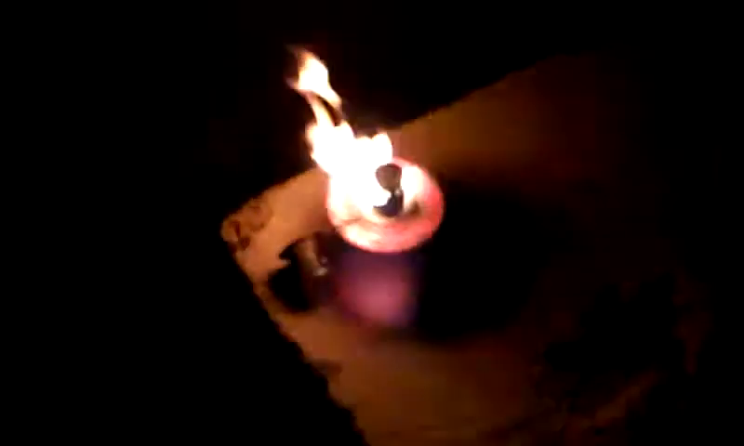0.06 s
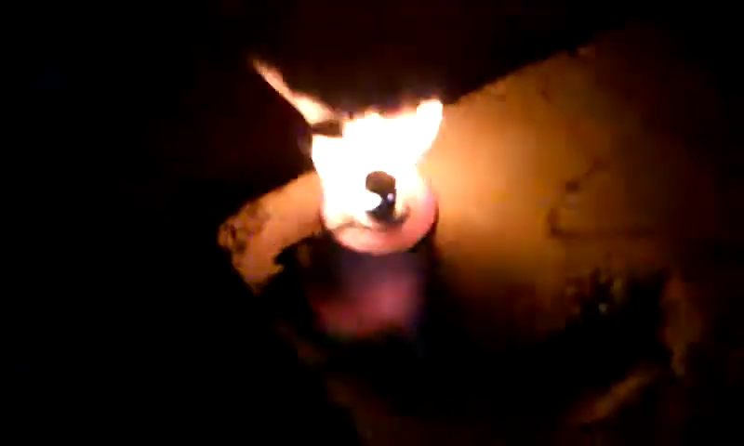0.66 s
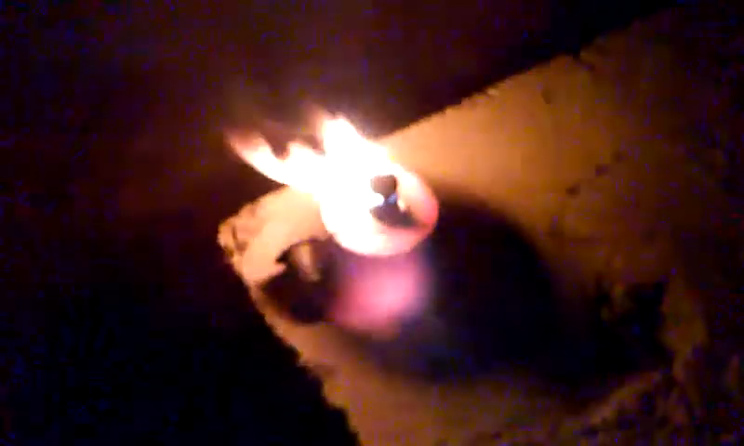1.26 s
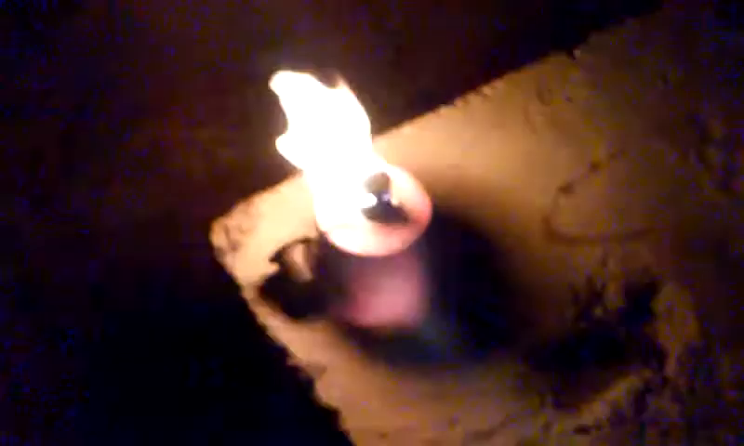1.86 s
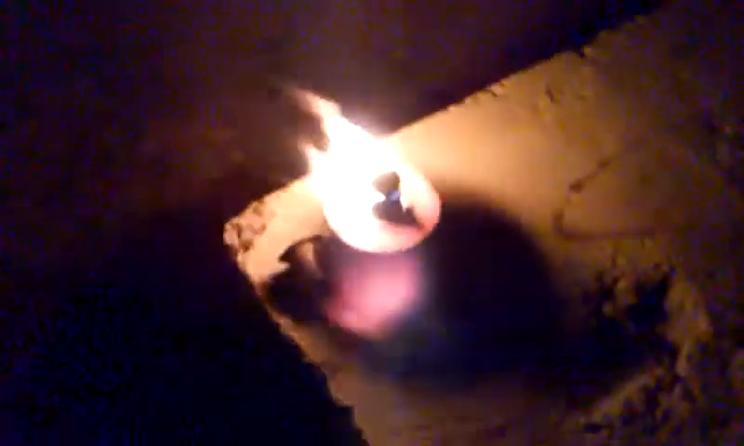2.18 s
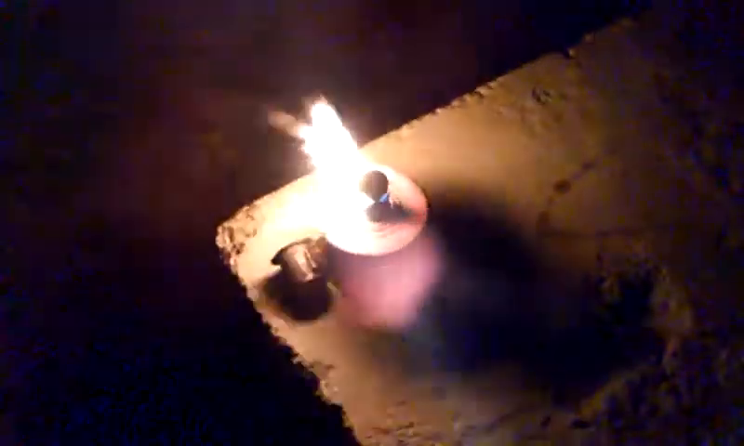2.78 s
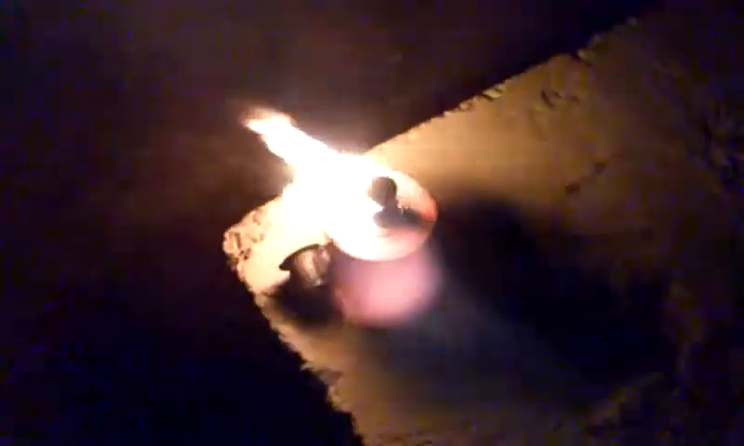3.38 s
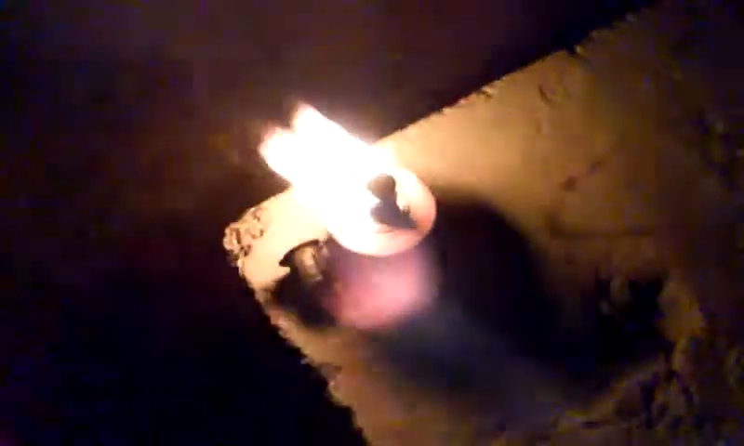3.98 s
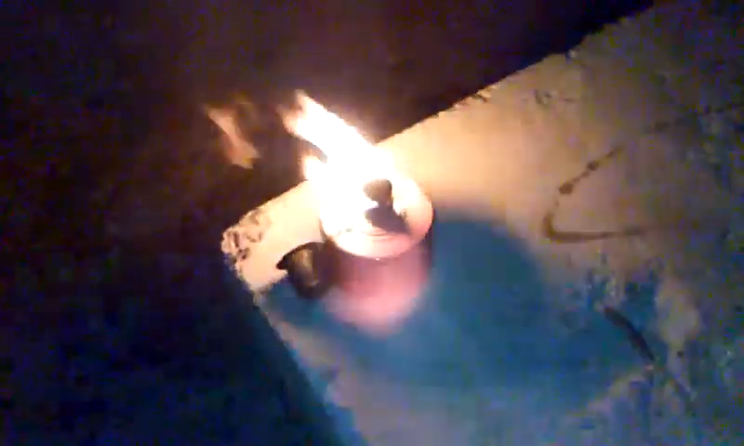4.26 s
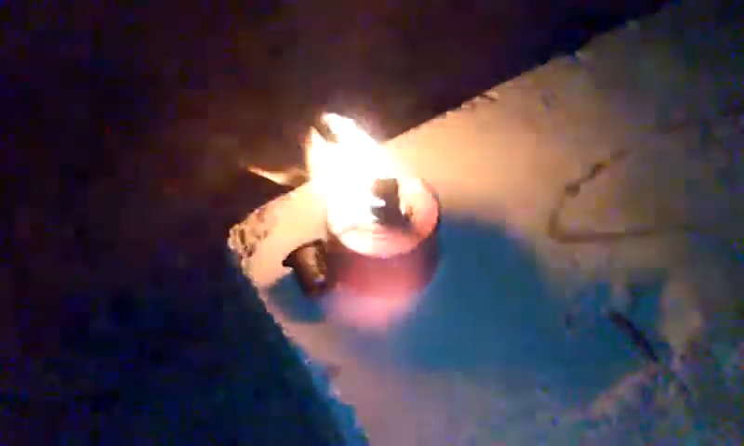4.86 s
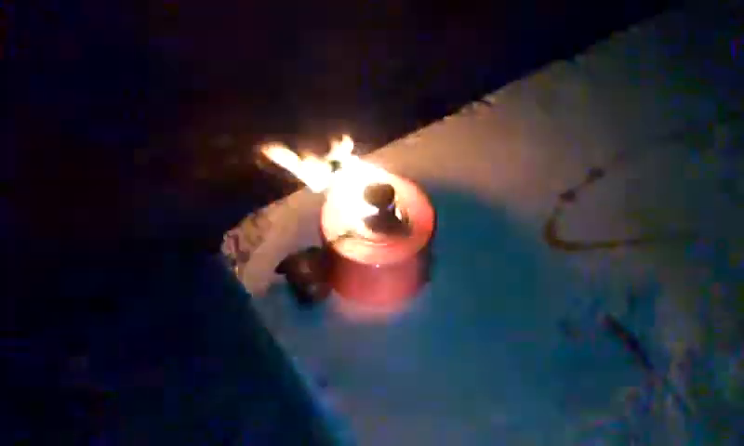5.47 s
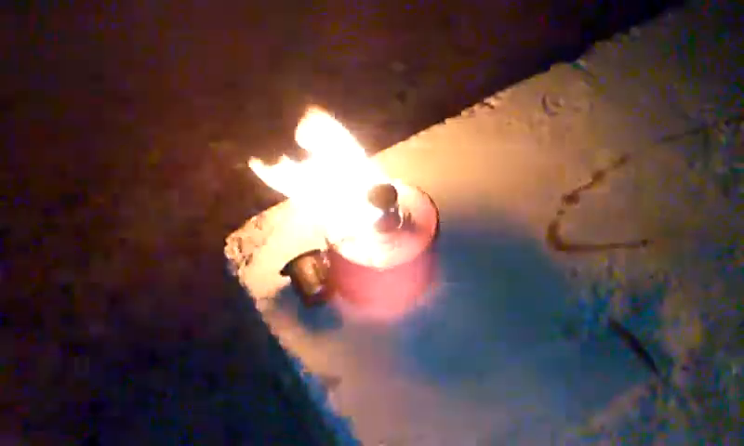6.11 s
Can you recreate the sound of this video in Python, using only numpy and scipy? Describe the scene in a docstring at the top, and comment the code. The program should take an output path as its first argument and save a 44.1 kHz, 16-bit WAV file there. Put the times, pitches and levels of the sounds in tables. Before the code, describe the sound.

Low, puffing flutter of a small burner flame in the wind, with light ticks and spits of boiling fuel.

```python
"""A tin-can burner in the night wind

A small burner flares on a concrete slab, close to the microphone. Its wind-torn flame flutters in
low puffs and now and then flaps hard. Fuel vapour hisses in spurts, and the boiling fuel sputters
and ticks. Wind rumbles underneath, and a soft rush of air dies away after the first second."""
import sys
import numpy as np
from scipy import signal
from scipy.fft import rfft, irfft
from scipy.io import wavfile
from scipy.ndimage import uniform_filter1d

SR = 44100
rng = np.random.default_rng(int(sys.argv[2]) if len(sys.argv) > 2 else 0)


def to_wav(s):
    """Save 16-bit WAV."""
    ch = np.atleast_2d(s).T  # columns
    pcm = np.round(np.clip(ch, -1, 1) * 32767)  # PCM
    wavfile.write(sys.argv[1], SR, pcm.astype(np.int16))


N = 275184
TIME = np.arange(N) / SR

# Wind on the microphone. Each row: time in seconds, level in dB.
WIND_LEVELS = [(0.0, -37), (0.33, -33), (0.52, -46), (1.0, -30.5), (1.3, -33.5), (2.25, -32), (2.45, -41),
               (2.6, -41), (3.4, -35.5), (3.7, -44), (4.0, -41), (4.4, -43), (4.8, -35), (5.35, -41),
               (5.6, -36.5), (5.85, -34.5), (6.05, -39.5), (6.24, -45)]
# The soft rush of the breeze. Each row: time in seconds, level in dB.
BREEZE_LEVELS = [(0, -56.5), (.25, -55.5), (.6, -55), (1.08, -59.5), (1.3, -73.5), (2.1, -72), (2.35, -60),
                 (2.6, -73), (6.24, -69)]
# Vapour and boiling fuel. Each row: time in seconds, relative levels of hiss and of fizz in dB.
VAPOUR_LEVELS = [(0, -60, -60), (.42, -64.5, -65.5), (.6, -65.5, -66), (.8, -62.5, -62.5),
                 (1.15, -63, -68.5), (1.35, -64, -65.5), (1.95, -63.5, -66), (2.42, -64.5, -63),
                 (2.62, -66.5, -65), (2.87, -68.5, -67), (3.22, -68, -72.5), (3.33, -70, -68.5),
                 (3.62, -73, -65), (3.93, -70, -69.5), (4.38, -68, -68), (4.47, -74, -72.5),
                 (4.6, -67, -64.5), (4.95, -67.5, -70.5), (5.17, -66.5, -68.5), (5.3, -68.5, -73),
                 (5.38, -65.5, -70), (5.6, -66.5, -73), (5.7, -69.5, -67.5), (5.92, -66.5, -75),
                 (6.24, -63, -66)]
# The flame's soft roar. Each row: time in seconds, relative level in dB.
ROAR_LEVELS = [(1.0, -68), (1.42, -61), (1.7, -62.5), (2.0, -72), (2.6, -63), (3.0, -65.5), (3.27, -57.5),
               (3.4, -56.5), (3.47, -57), (3.58, -53), (3.72, -64), (4.15, -60.5), (4.38, -63.5),
               (4.47, -64.5), (4.7, -57.5), (4.88, -63.5), (5.17, -53.5), (5.33, -60.5), (5.59, -53),
               (5.69, -62), (6.1, -56.5), (6.24, -64)]
# The flame flares and sinks. Each row: time in seconds, relative levels of puffs and of swirls in dB.
FLAME_LEVELS = [(0.0, -11, -35), (0.08, -30, -43), (0.19, -25.5, -39), (0.38, -28.5, -42), (0.7, -29, -43),
                (0.77, -30, -43.5), (1.1, -30, -40), (1.25, -31, -42.5), (1.42, -33.5, -55),
                (1.58, -34.5, -50.5), (1.78, -34.5, -45.5), (2.08, -26, -38.5), (2.3, -30.5, -41.5),
                (2.53, -30.5, -39.5), (2.66, -30.5, -45.5), (2.82, -32, -54), (3.0, -29, -44.5),
                (3.18, -28, -45), (3.4, -39, -45.5), (3.52, -33, -47.5), (3.62, -45, -55), (3.86, -40, -64),
                (3.98, -29.5, -43), (4.07, -27.5, -50), (4.2, -35.5, -48), (4.42, -48, -52.5),
                (4.52, -44, -57), (4.62, -42.5, -71), (4.82, -32.5, -46), (5.4, -34.5, -47.5),
                (5.66, -35.5, -55.5), (5.82, -27.5, -39), (5.93, -31, -37.5), (6.02, -37, -45),
                (6.14, -23.5, -40.5), (6.24, -38.5, -40.5)]

# The tone of each noise, from low to high. Each row: frequency in Hz, relative strength in dB.
WIND_TONE = [(14, -13), (25, -10), (45, -8.5), (65, -4), (100, -16), (200, -36.5)]  # deep rumble
BREEZE_TONE = [(500, -4.5), (730, -6.5), (870, 4.5), (1080, 1), (1280, -9.5), (1650, -8), (2000, -16),
               (2250, -12.5), (2500, -28), (2850, -9.5), (3300, -60), (4500, -55)]  # hollow rush
SPURT_TONE = [(3800, -7), (5600, -4), (6300, -4), (7100, 4.5), (9000, 3), (10400, 5), (12000, -1),
              (15500, -3)]  # bright jet
HISS_TONE = [(3000, -49), (5500, -8.5), (7200, 5), (8500, 5), (10300, 4), (12500, 0.5), (15500, -4)]  # thin, high vapour
FIZZ_TONE = [(1500, 8.5), (2200, 3.5), (2600, -3.5), (3150, 1.5), (3700, 0), (4500, 1.5), (5200, -2),
             (6000, 3), (8000, -23)]  # boiling fuel
ROAR_TONE = [(280, 11.5), (420, 5.5), (600, -1), (740, -0.5), (950, -4), (1200, -3.5), (1550, -4.5),
             (1950, -17), (2250, -6), (2700, -10), (4000, -15.5)]  # the flame's edge
SWIRL_TONE = [(110, -52), (185, 3), (235, -1), (300, -8), (400, -19.5), (600, -30.5), (1000, -62),
              (2000, -93)]  # small swirls in the flame
PUFF_TONE = [(20, -56), (35, -17.5), (60, 0.5), (90, 2.5), (120, 0), (155, -5), (200, -14.5), (260, -28),
             (350, -35), (500, -59)]  # low puffs of flame

# The tones the hot tin rings with. Each row: pitch in Hz, level in dB, fade time in seconds.
TIN_TONES = [(8450, -54, .008), (8900, -55, .008), (13900, -53, .004), (14550, -47, .004)]
# Hollow notes. Each row: start in seconds, level in dB, pitch in Hz, fade time in seconds.
HOOTS = [(1.402, -43.5, 602, 0.019), (4.502, -42.5, 315, 0.028)]
# Patches of frying fuel. Each row: middle in seconds, half length in seconds, level in dB.
SIZZLES = [(.65, 0.28, -74), (1.393, 0.18, -73), (1.708, 0.041, -71), (2.03, 0.23, -74),
           (3.484, 0.086, -72.5), (4.68, 0.069, -72)]
# Spurts of vapour. Each row: start in seconds, length in seconds, level in dB, treble tilt in dB/octave.
SPURTS = [(.1, 0.22, -82, 9), (0.237, 0.3, -64.5, 4), (2.702, 0.081, -66, -6), (2.899, 0.068, -65, -4),
          (2.98, 0.064, -68.5, -3), (3.08, .06, -68, -6), (3.145, 0.13, -67, -8), (3.395, 0.13, -68.5, 0),
          (3.541, 0.164, -65.5, -1), (3.73, 0.02, -68, -2), (3.778, 0.087, -66.5, -10),
          (4.083, .075, -67, 9), (4.508, 0.039, -68, -1), (5.055, 0.066, -66.5, -8)]
# Loud bursts of fuel. Each row: time in seconds, relative peak in dB, pitch in Hz, width in octaves.
SPUTTERS = [(0.4421, -43, 915, 0.5), (.532, -42, 770, 1.8), (.729, -41, 426, 1.1), (.797, -43, 484, 0.65),
            (.84, -48, 620, 1.2), (1.236, -38, 354, 0.54), (1.3, -47, 460, 0.49), (1.362, -47, 476, 0.51),
            (1.57, -53, 1520, 0.3), (1.68, -60, 1750, 0.9), (1.8, -53, 1290, 0.54),
            (2.8262, -49, 1860, 0.62), (3.07, -49, 890, 0.69), (3.178, -53, 844, 0.61),
            (3.21, -56, 1810, 0.81), (3.2657, -40, 640, 2.2), (3.295, -46, 620, 2.2),
            (3.3378, -52, 1270, 0.43), (3.353, -52, 1500, 0.28), (3.4417, -38.5, 704, 1.7),
            (3.4669, -42.5, 730, 1.9), (3.484, -41, 750, 2.4), (3.4934, -44, 1080, 0.41),
            (3.526, -51, 950, 0.78), (3.7393, -44.5, 1090, 0.83), (3.7836, -53, 1120, 0.58),
            (3.798, -49, 1080, 0.67), (3.8273, -48, 850, 0.47), (3.865, -48, 1060, 0.57),
            (3.9187, -48, 1360, 0.35), (4.073, -51, 900, 1.2), (4.16, -57, 650, 0.61),
            (4.25, -49.5, 800, 2.8), (4.317, -52, 555, 0.35), (4.3656, -52, 1160, 0.54),
            (4.396, -51, 990, 1.2), (4.569, -51, 640, 0.75), (4.636, -48, 395, 0.89),
            (4.6552, -48.5, 990, 0.35), (4.9788, -45, 1020, 0.18), (5.076, -50, 1100, 0.86),
            (5.091, -45, 1210, 0.6), (5.133, -42.5, 1030, 0.41), (5.143, -47, 1480, 0.35),
            (5.1691, -32.5, 990, 0.69), (5.1844, -38, 790, 1.07), (5.236, -50, 1160, 0.32),
            (5.538, -57, 796, 0.91), (5.58, -42, 850, 0.84), (5.588, -37, 1150, 0.82),
            (5.6122, -45, 760, 1.3), (5.635, -52, 1340, 0.55), (5.7555, -45, 920, 0.45),
            (5.815, -52, 960, 0.32), (5.8531, -45, 740, 1.1), (5.9543, -49.5, 840, 0.52),
            (5.97, -49.5, 1150, 0.42), (6.0211, -49, 1010, 0.56), (6.09, -49.5, 1450, 1.15),
            (6.1027, -47.5, 1350, 0.42)]  # large pockets
SPITS = [(.14, -57, 2230, 0.45), (.3, -54, 2800, 0.76), (.357, -50, 3700, 1.3), (0.5244, -51.5, 4130, 0.23),
         (.732, -56, 3900, 0.51), (1.114, -57.5, 2900, .5), (1.29, -61, 4430, 0.16),
         (1.36, -63, 4700, 0.17), (1.726, -56, 3100, .3), (1.785, -57.5, 3120, 0.3),
         (1.865, -56.5, 3860, 0.36), (1.7434, -50, 3130, 0.28), (1.8903, -53, 4370, 0.29),
         (1.9163, -50.5, 3360, 0.23), (2.0167, -53.5, 4520, 0.18), (2.397, -50, 6760, 0.32),
         (2.4052, -46, 3780, 0.22), (2.5607, -53, 5850, .15), (2.991, -50, 4200, 0.14),
         (3.1492, -50, 5140, 0.51), (3.441, -53.5, 5040, 1.7), (3.634, -52, 3600, 0.69),
         (3.6561, -48.5, 4400, 0.23), (3.6972, -56, 4530, 0.19), (3.8245, -56, 2860, 0.13),
         (4.0965, -43.5, 5400, 0.27), (4.2506, -56.5, 3640, 0.36), (5.0691, -55, 2280, 0.18),
         (5.145, -59, 3200, 0.21), (5.185, -58, 3000, 0.7), (5.5889, -47.5, 3170, 0.17),
         (5.6, -56, 3120, 0.16), (5.617, -60, 3150, 0.16), (5.636, -60, 3280, .25),
         (5.9844, -50, 2600, 0.66), (5.9972, -56, 3240, 0.22), (6.022, -55, 2400, .8),
         (6.085, -57, 2600, 0.93), (6.105, -55, 2930, 1.2), (6.13, -59, 3300, 0.46)]  # smaller pockets
TICKS = [(0.7926, -46.5, 7850, 0.55), (.988, -50, 8300, 0.65), (1.298, -54, 7700, 0.32),
         (1.3213, -48, 7700, 0.52), (1.475, -49.5, 9500, .7), (1.744, -47.5, 7500, .8),
         (2.0523, -50.5, 9000, .5), (2.2388, -45.5, 8600, .55), (2.2558, -50, 8800, 0.49),
         (2.4597, -45.5, 7100, 0.51), (2.7065, -40, 10300, 0.23), (2.7243, -51, 10500, .4),
         (2.9216, -48.5, 8350, 0.82), (3.0132, -48, 7900, .6), (3.0757, -49, 9200, 0.77),
         (3.119, -52, 7800, 0.29), (3.1686, -48.5, 6300, 0.49), (3.1948, -49, 8700, 0.99),
         (3.21, -47, 10000, 1), (3.4894, -48, 5670, .8), (3.5535, -50, 9400, 0.59),
         (3.7816, -49.5, 7200, 0.65), (3.9236, -52, 7500, 1), (4.094, -47, 8500, 0.61),
         (4.5099, -51, 7600, .6), (5.0614, -44, 7460, 0.53)]  # droplets
# Hard flaps of flame. Each row: middle in seconds, relative peak in dB, pitch in Hz, half length in cycles.
FLAPS = [(0.013, -9, 167, 0.78), (0.044, -13, 118, 1.8), (0.138, -26, 92, 1.1), (0.166, -17.5, 181, 1.04),
         (0.184, -16.5, 96, 1.1), (.21, -15, 96, 1), (0.294, -16.5, 77, 0.68), (.355, -23, 153, 1.8),
         (0.403, -20, 87, 1), (.462, -18.5, 105, 0.98), (0.631, -18.5, 100, 3), (.68, -20, 98, 0.74),
         (0.723, -11, 129, 0.69), (0.885, -16, 91, .8), (0.922, -21, 94, 1.06), (.98, -17, 81, 0.56),
         (1.049, -15.5, 108, 0.68), (1.121, -19, 122, .5), (1.138, -19.5, 74, 0.34),
         (1.233, -16.5, 149, 0.77), (1.273, -16.5, 95, 0.64), (1.335, -18.5, 112, 0.82),
         (1.383, -15, 85.5, 0.76), (1.671, -22, 121, 1.25), (1.853, -16.5, 97.5, 0.63),
         (1.926, -23.5, 127, 0.81), (2.014, -15, 125, 0.51), (2.035, -20, 99, 0.6), (2.063, -21, 150, 0.92),
         (2.128, -20, 192, 0.65), (2.186, -18, 109, 0.95), (2.371, -17.5, 90, 2.9),
         (2.502, -14.5, 124, 0.52), (2.559, -12.5, 104.5, 0.93), (2.775, -17, 88, 0.51),
         (2.899, -16, 146, 0.43), (2.924, -22.5, 88, 0.97), (2.974, -14.5, 101, 0.46),
         (3.105, -16.5, 101, 0.6), (3.153, -23.5, 116, 1), (3.2, -18, 103, 0.76), (3.266, -27, 125, .5),
         (3.378, -18.5, 106, 0.52), (3.427, -22.5, 104, .7), (3.468, -24.5, 103, 2),
         (3.505, -21.5, 99, 1.9), (3.955, -24, 75, 1.7), (4.04, -25, 135, 0.66), (4.062, -17, 115, 0.38),
         (4.13, -25.5, 96, 1.3), (4.158, -19.5, 119, 2), (4.225, -17.5, 89.5, 1), (4.314, -23.5, 82, 1.7),
         (4.49, -26.5, 87, 2.3), (4.562, -20.5, 89, 0.71), (4.825, -17.5, 78, 1.25),
         (4.87, -17, 82.4, 1.07), (5.215, -16, 88, 0.88), (5.387, -16.5, 91, 0.43), (5.421, -21, 110, 0.5),
         (5.53, -21, 87, 0.79), (5.563, -18.5, 102, 1.5), (5.684, -21.5, 84, .5), (5.765, -19, 122, 0.38),
         (5.793, -17, 150, .6), (5.872, -17.5, 140, 0.76), (5.942, -17, 122, 1.5), (5.983, -17.5, 97, 1.2),
         (6.123, -11.5, 96.7, 1.5), (6.15, -19.5, 128, 1), (6.176, -10.5, 118, 0.65)]
# The whole sound dips briefly. Each row: middle in seconds, half length in seconds, depth in dB.
DIPS = [(3.719, 0.0049, 14), (3.874, 0.013, 9), (4.428, 0.011, 13)]


def gain(db):
    """Turn decibels into a number to multiply a sound by."""
    return 10 ** (np.asarray(db) / 20)


def normalise(x):
    """Scale a sound so that its average strength (rms) is 1."""
    return x / np.sqrt(np.mean(x ** 2))


def curves(table):
    """Join a table's points with straight lines, giving one curve for each level column."""
    times, *columns = np.transpose(table)
    return [np.interp(TIME, times, column) for column in columns]


def shape(x, tone):
    """Filter a sound to follow a tone table, at strength 1."""
    hz, db = np.transpose(tone)
    freqs = np.maximum(np.arange(N // 2 + 1) * SR / N, 1)
    weights = gain(np.interp(np.log(freqs), np.log(hz), db))
    roll_off = np.minimum(freqs / hz[0], 1) * np.minimum(hz[-1] / freqs, 1)
    return normalise(irfft(rfft(x) * weights * roll_off ** 2, N))


def drift(rate_hz):
    """A smooth random wobble, typically about 1 in size."""
    hold = int(SR / rate_hz)
    steps = rng.standard_normal(N)[np.arange(N) // hold]
    return normalise(uniform_filter1d(steps, hold))


def clicks(per_second, spread_db):
    """Random clicks, mostly small and a few large, at strength 1."""
    present = rng.random(N) < per_second / SR
    size = gain(spread_db * np.minimum(rng.exponential(size=N), 5))
    return normalise(present * size * rng.choice([-1, 1], N))


def even_out(x, span_s):
    """Flatten slow swells, keeping any flutter quicker than the span."""
    span = int(span_s * SR)
    power = uniform_filter1d(uniform_filter1d(x ** 2, span), span)
    return x / np.sqrt(np.abs(power) + 1e-9)


def band(x, hz, octaves):
    """Keep only the frequencies around one pitch."""
    edges = np.minimum(hz * 2. ** (octaves * np.array([-.5, .5])), [SR / 3, SR / 2 - 1000])
    return signal.sosfilt(signal.butter(3, edges, "bandpass", fs=SR, output="sos"), x)


def add(out, start_s, sound):
    """Mix a sound into out at the given time."""
    place = int(start_s * SR) + np.arange(len(sound))
    inside = (place >= 0) & (place < N)
    out[place[inside]] += sound[inside]


def pops(per_second, low_hz, high_hz, cycles, spread_db):
    """A swarm of short pitched pops, each swelling fast and soon dying, at strength 1."""
    out = np.zeros(N)
    draws = rng.random((4000, 4))
    for when, pitch, size, phase in draws[:int(per_second * N / SR)]:
        hz = low_hz * (high_hz / low_hz) ** pitch
        age = np.arange(int(7 * cycles * SR / hz)) * hz / SR / cycles  # the pop is loudest at age 1
        pop = age * np.exp(-age) * np.sin(2 * np.pi * (age * cycles + phase))
        db = spread_db * min(-np.log(1 - size), 4)
        add(out, when * N / SR, gain(db) * pop)
    return normalise(out)


def microphone_hiss(level_db=-78):
    """The microphone adds a faint, steady hiss."""
    return gain(level_db) * rng.standard_normal(N)


def breeze(echo=0.14, delay_s=0.00441, wander=0.074, flicker_db=2):
    """A hollow rush of air mixes with its echo off the ground, whose short delay wanders."""
    level_db, = curves(BREEZE_LEVELS)
    rush = shape(rng.standard_normal(N), BREEZE_TONE)
    bounce = np.interp(TIME - delay_s * (1 + wander * drift(4)), TIME, rush)
    return gain(level_db + flicker_db * drift(40)) * normalise(rush + echo * bounce)


def wind():
    """Slow swirls of wind press on the microphone and make it rumble."""
    level_db, = curves(WIND_LEVELS)
    rumble = shape(rng.standard_normal(N), WIND_TONE)
    return gain(level_db) * even_out(rumble, span_s=0.088)


def tink(start_s=.454, rise_s=.001):
    """The hot tin expands and rings once, very briefly."""
    age = np.maximum(TIME - start_s, 0)
    swell = 1 - np.exp(-age / rise_s)
    return swell * sum(gain(db) * np.exp(-age / fade_s) * np.sin(2 * np.pi * hz * age)
                       for hz, db, fade_s in TIN_TONES)


def hoots(rise_s=0.0044, waver=0.028):
    """Short, wavering hollow notes, like air blowing across the can's opening."""
    out = np.zeros(N)
    for start_s, db, hz, fade_s in HOOTS:
        age = np.maximum(TIME - start_s, 0)
        swell = (1 - np.exp(-(age / rise_s) ** 2)) * np.exp(-age / fade_s)
        pitch_hz = hz * (1 + waver * drift(100))
        out += gain(db) * swell * np.sin(2 * np.pi * np.cumsum(pitch_hz) / SR)
    return out


def sizzle(hz=4450, spread=1.06):
    """Patches of fuel fry on the hot lid in tiny pops, all near one pitch."""
    patches = sum(gain(db) * np.exp(-((TIME - middle_s) / half_s) ** 4)
                  for middle_s, half_s, db in SIZZLES)
    return patches * pops(90, low_hz=hz / spread, high_hz=hz * spread, cycles=5, spread_db=2.5)


def spurts(rise_s=0.0023, fade_s=.018, spray_db=-4):
    """Vapour breaks out, blows for a moment with a fine spray of droplets, and chokes off."""
    out = np.zeros(N)
    t = np.arange(SR // 2) / SR
    jet = shape(rng.standard_normal(N) + gain(spray_db) * clicks(830, spread_db=6), SPURT_TONE)
    octave = np.log2(np.maximum(np.fft.rfftfreq(len(t), 1 / SR), SPURT_TONE[0][0]))
    for start_s, length_s, db, tilt in SPURTS:
        piece = np.roll(jet, -int(start_s * SR))[:len(t)]
        gas = normalise(irfft(rfft(piece) * gain(tilt * octave), len(t)))  # brighter or duller
        opening = 1 - np.exp(-t / rise_s)
        closing = np.exp(-np.maximum(t - length_s, 0) / fade_s)
        add(out, start_s, gain(db) * opening * closing * gas)
    return out


def vapour(hiss_db=-0.3, fizz_db=-2, droplet_db=-11, simmer_db=-9.5, surge_hz=16, surge_db=.5):
    """Vapour hisses out of the can in small, uneven surges, dotted with tiny bubbles of boiling fuel."""
    jet_db, boil_db = curves(VAPOUR_LEVELS)
    hiss = shape(rng.standard_normal(N), HISS_TONE) * gain(.5 * drift(40))
    droplets = pops(140, low_hz=6500, high_hz=11000, cycles=3, spread_db=3.5)
    fizz = shape(rng.standard_normal(N), FIZZ_TONE) * gain(0.57 * drift(50))
    simmer = pops(220, low_hz=2900, high_hz=5600, cycles=4.5, spread_db=2.8)
    jet = gain(hiss_db) * hiss + gain(droplet_db) * droplets
    boil = gain(fizz_db) * fizz + gain(simmer_db) * shape(simmer, FIZZ_TONE)
    return gain(surge_db * drift(surge_hz)) * (gain(jet_db) * jet + gain(boil_db) * boil)


def weak_rows(level_db, above_db, low_hz, high_hz, octaves, count=20, spread_db=5):
    """Rows like those of SPUTTERS for weak bursts at random times, a little above a level curve."""
    when, size, pitch = rng.random((count, 3)).T
    db = level_db[(when * N).astype(int)] + above_db + spread_db * (size - .5)
    hz = low_hz * (high_hz / low_hz) ** pitch
    return list(zip(when * N / SR, db, hz, np.full(count, octaves)))


def bursts(rows, rise_s, fade_s, tail_db, tail_s):
    """Each pocket of fuel bursts with a short pop of noise and leaves a weak, wider hiss behind."""
    out = np.zeros(N)
    t = np.arange(-SR // 50, SR // 8) / SR
    age = np.maximum(t, 0)
    rise = np.exp(-(np.minimum(t, 0) / rise_s) ** 2)
    for time_s, db, hz, octaves in rows:
        pop_noise, tail_noise = rng.standard_normal((2, len(t)))
        pop = band(pop_noise * rise * np.exp(-age / fade_s), hz, octaves)
        tail = normalise(band(tail_noise, hz, octaves + .5)) * rise * np.exp(-age / tail_s)
        burst = pop / np.abs(pop).max() + gain(tail_db) * tail
        add(out, time_s + t[0] - fade_s / 2, gain(db) * burst)
    return out


def crackle(sputter_db=1, spit_db=2, tick_db=3):
    """Large pockets of boiling fuel sputter, smaller ones spit, and bursting droplets tick."""
    roar_db, = curves(ROAR_LEVELS)
    jet_db, boil_db = curves(VAPOUR_LEVELS)
    weak_sputters = weak_rows(roar_db, above_db=6, low_hz=750, high_hz=1500, octaves=.8)
    weak_spits = weak_rows(boil_db, above_db=6, low_hz=2700, high_hz=5600, octaves=.4)
    weak_ticks = weak_rows(jet_db, above_db=9, low_hz=6800, high_hz=9800, octaves=.8)
    sputters = bursts(SPUTTERS + weak_sputters, rise_s=.0024, fade_s=.00483, tail_db=-33, tail_s=.055)
    spits = bursts(SPITS + weak_spits, rise_s=.0016, fade_s=.003, tail_db=-20.5, tail_s=.055)
    ticks = bursts(TICKS + weak_ticks, rise_s=.0006, fade_s=.0012, tail_db=-28, tail_s=.02)
    return gain(sputter_db) * sputters + gain(spit_db) * spits + gain(tick_db) * ticks


def roar(noise_db=-7, pop_db=-6, rasp_db=-7.5, flicker_db=3):
    """The edge of the flame tears into small pops and a dry rasp over a soft roar."""
    level_db, = curves(ROAR_LEVELS)
    noise = shape(rng.standard_normal(N), ROAR_TONE) * gain(flicker_db * drift(60))
    popping = shape(pops(110, low_hz=520, high_hz=1900, cycles=3, spread_db=3), ROAR_TONE)
    rasp = shape(clicks(350, spread_db=2.5), ROAR_TONE)
    return gain(level_db) * (gain(noise_db) * noise + gain(pop_db) * popping + gain(rasp_db) * rasp)


def flaps(flap_db=-1.27, swirl_db=-34, tear_hz=104):
    """The sheet of flame snaps: a quick suck and push of air that tears off small swirls."""
    snaps, tearing = np.zeros(N), np.zeros(N)
    t = np.arange(-SR // 25, SR // 25) / SR
    for (middle_s, db, hz, cycles), phase in zip(FLAPS, rng.random(len(FLAPS))):
        swell = gain(db) * np.exp(-(t * hz / cycles) ** 2) * np.hanning(len(t))
        add(snaps, middle_s + t[0], swell * np.cos(2 * np.pi * (hz * t + phase)))
        add(tearing, middle_s + t[0], swell * (hz / tear_hz) ** 2)  # quicker flaps tear off more
    swirls = shape(rng.standard_normal(N), SWIRL_TONE)
    return gain(flap_db) * snaps + gain(swirl_db) * tearing * swirls


def puffing(puff_hz=11.8, unevenness=0.2635, puff_db=2, gust_hz=13, gust_db=3.5):
    """A loudness curve: the flame swells and pinches off in a loose rhythm while wind tugs at it."""
    cycles = np.cumsum(puff_hz * np.exp(unevenness * drift(10))) / SR
    gusts = np.minimum(drift(gust_hz), 1)
    return normalise(gain(puff_db * np.cos(2 * np.pi * cycles) + gust_db * gusts))


def flutter(body_db=1, swirl_db=-1.5, flicker_db=4.5):
    """Pockets of vapour burn in quick, low puffs; small swirls ride on the big ones."""
    low_db, fast_db = curves(FLAME_LEVELS)
    body = even_out(shape(clicks(500, spread_db=3), PUFF_TONE), span_s=.05)
    swirls = even_out(shape(clicks(1200, spread_db=2), SWIRL_TONE), span_s=.05)
    swirls = normalise(swirls * gain(flicker_db * np.minimum(drift(45), 1)))
    return puffing() * (gain(low_db + body_db) * body + gain(fast_db + swirl_db) * swirls)


def scene():
    """Mix flame, fuel and wind into one channel; the level dips briefly three times."""
    burner = flutter() + flaps() + roar() + hoots() + crackle() + sizzle() + vapour() + spurts() + tink()
    mix = burner + wind() + breeze() + microphone_hiss()
    dip_db = sum(db * np.exp(-((TIME - middle_s) / half_s) ** 2) for middle_s, half_s, db in DIPS)
    return (mix * gain(-dip_db))[None]


def record(dry, fade_s=.003, top_hz=15500):
    """Fade both ends quickly and cut the highest treble."""
    from_edge_s = np.minimum(TIME, TIME[::-1])
    fade = np.sin(np.pi / 2 * np.minimum(from_edge_s / fade_s, 1)) ** 2
    low_pass = signal.ellip(10, .1, 80, top_hz, fs=SR, output="sos")
    return signal.sosfilt(low_pass, dry * fade)


dry = scene()
out = record(dry)
to_wav(out)
```